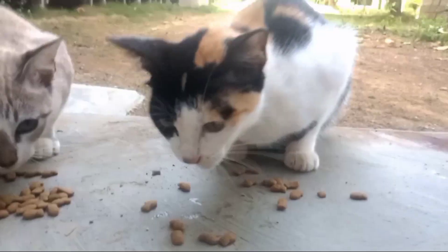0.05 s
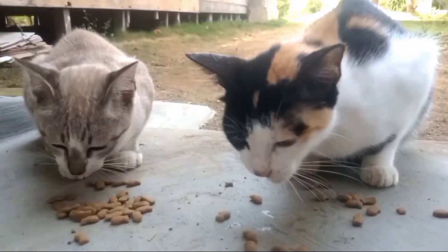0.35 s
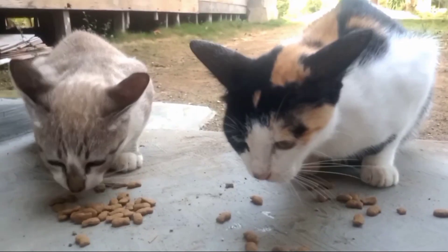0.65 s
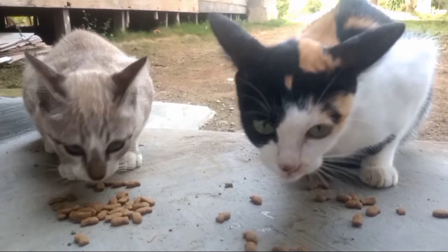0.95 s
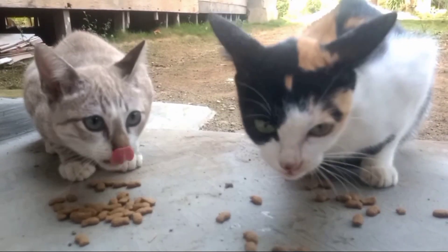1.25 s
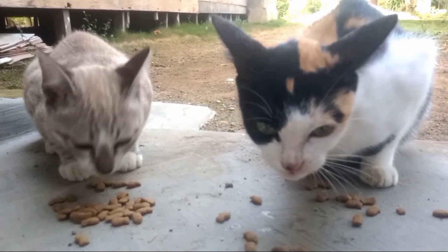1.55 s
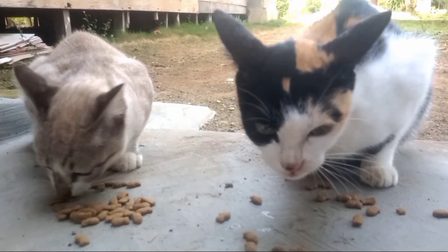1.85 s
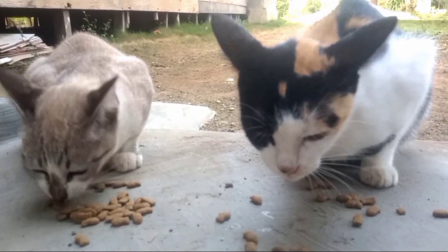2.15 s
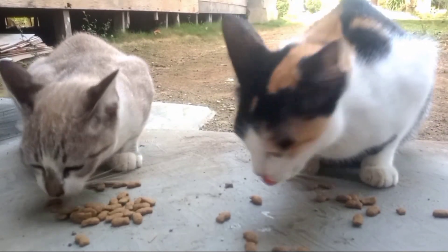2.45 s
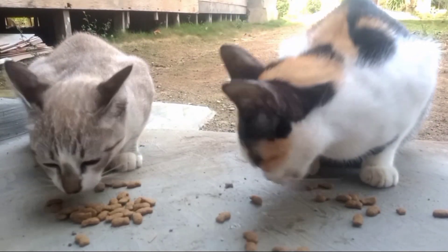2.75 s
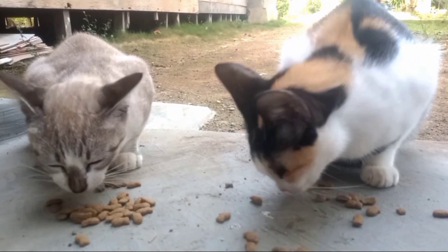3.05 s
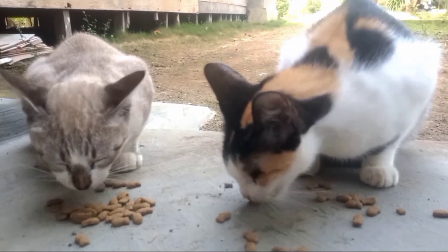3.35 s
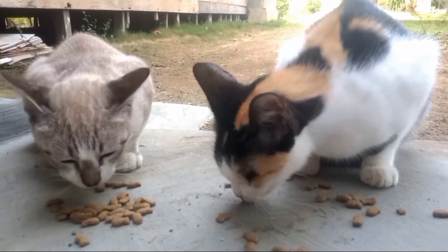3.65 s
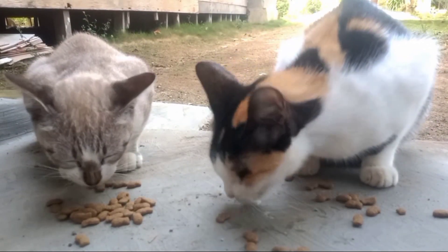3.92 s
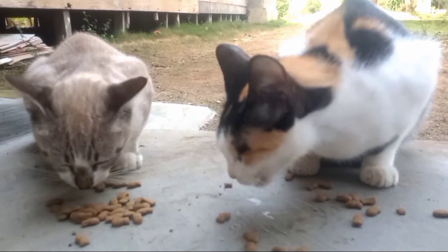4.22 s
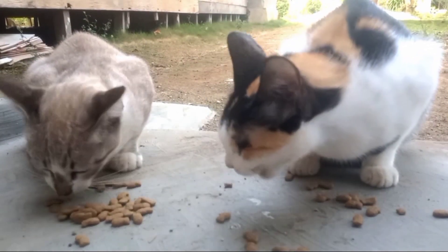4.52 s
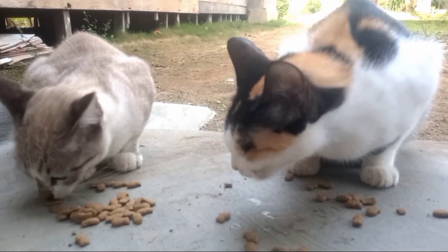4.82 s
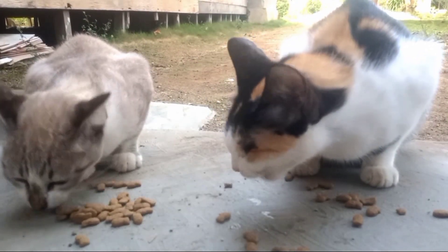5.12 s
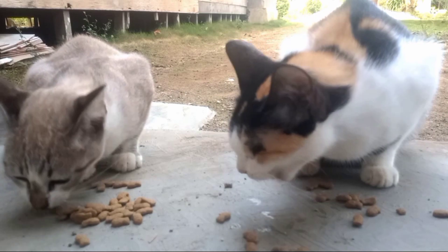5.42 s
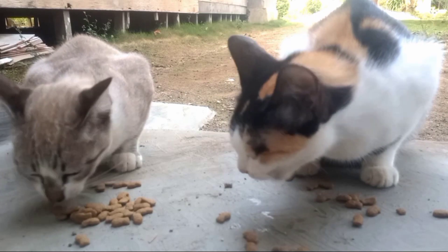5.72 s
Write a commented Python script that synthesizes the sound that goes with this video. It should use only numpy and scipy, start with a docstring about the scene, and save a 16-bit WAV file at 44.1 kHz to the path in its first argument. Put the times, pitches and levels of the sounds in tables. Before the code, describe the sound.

A hand briefly rubs and knocks against the microphone. Then two cats eat dry kibble close by on an outdoor concrete porch, with sharp, irregular cracks, wet lip smacks, soft licks and faintly ticking crumbs. Behind them a small engine chugs past with a low beat, growing louder and slowly gaining speed. A soft rush of outdoor air lies under everything.

```python
"""Two cats crunch dry kibble on a concrete porch: each bite cracks, crumbles, rings the mouth and
bounces off the floor, among wet smacks, licks and ticking crumbs. At first a hand brushes, rubs and
knocks a camera case close by. Behind them a small one-cylinder engine chugs past, slowly gaining
speed, its beat smeared by echoes from house walls. A soft outdoor rush lies under everything."""
import sys
import numpy as np
from scipy import signal
from scipy.fft import rfft, irfft, next_fast_len
from scipy.io import wavfile
from scipy.ndimage import uniform_filter1d, map_coordinates

SR = 44100
rng = np.random.default_rng(int(sys.argv[2]) if len(sys.argv) > 2 else 0)


def wav_out(sig):
    """Save sig, one row per channel (or a flat mono array), as 16-bit PCM at SR to the path in sys.argv[1]."""
    wavfile.write(sys.argv[1], SR, np.round(np.clip(np.atleast_2d(sig).T, -1, 1) * 32767).astype(np.int16))


N = 259308
TIME_S = np.arange(N) / SR


def amp(db):
    """Decibels to gain."""
    return 10 ** (np.asarray(db) / 20)


def unit(x):
    """x scaled to rms 1."""
    return x / np.sqrt(np.mean(x ** 2) + 1e-20)


def curves(rows):
    """One value per sample for each column after the time."""
    times_s, *columns = np.transpose(rows)
    return [np.interp(TIME_S, times_s, column) for column in columns]


def wobble(knots_per_s):
    """A smooth random curve."""
    knots = rng.standard_normal(int(N * knots_per_s / SR) + 4)
    return map_coordinates(knots, [np.arange(N) * knots_per_s / SR])


def swell(middle_s, length_s):
    """A smooth rise and fall, peak 1."""
    return np.cos(np.pi * np.clip((TIME_S - middle_s) / length_s, -.5, .5)) ** 2


def filtered(x, response):
    """x times a complex response of frequency."""
    size = 2 * next_fast_len(len(x) * 2 // 3)
    return irfft(rfft(x, size) * response(np.fft.rfftfreq(size, 1 / SR)), size)[:len(x)]


def coloured(x, points):
    """x through a minimum-phase filter with the gain of the (Hz, dB) points."""
    def response(hz):
        points_hz, db = np.transpose(points)
        cepstrum = irfft(np.log(amp(np.interp(np.log(hz + 1), np.log(points_hz), db))))
        half = len(hz) - 1
        cepstrum[1:half] *= 2
        cepstrum[half + 1:] = 0
        return np.exp(rfft(cepstrum))
    return filtered(x, response)


def resonant(x, modes):
    """x through (centre Hz, width Hz, dB) resonances."""
    def response(hz):
        return sum(amp(db) * 1j * hz * width / (centre ** 2 - hz ** 2 + 1j * hz * width)
                   for centre, width, db in modes)
    return filtered(x, response)


# Outdoor rush and hiss. Each row: time in seconds, relative level in dB.
AIR_LEVELS = [(0.42, -48.5), (1.48, -49), (2.55, -45), (3.77, -44), (5.8, -45.5)]
# Spectra of rush, hiss (also of the swishes) and rumble. Each row: frequency in Hz, gain in dB.
RUSH_SPECTRUM = [(250, 2.5), (550, 11), (800, 4.5), (1050, 2), (1270, 3.5), (1480, 2), (1900, 3),
                 (2300, 0.5), (3300, -1.5), (4200, -8), (5300, -26), (7000, -41.5), (12000, -74.5)]
HISS_SPECTRUM = [(3000, -23), (5500, -5), (6500, -5.5), (7800, 3.5), (9500, -4.5), (12000, -9), (14000, -4),
                 (15400, -6), (16000, -31)]
RUMBLE_SPECTRUM = [(38, -42), (57, 4), (75, 0), (100, 3.5), (150, -0.5), (230, -3), (420, -12), (600, -30),
                   (1000, -49), (4000, -110)]
# Far whistles. Each row: middle in seconds, length in seconds, pitch in Hz, level in dB.
WHISTLES = [(1.858, 0.034, 3700, -47.5), (4.38, 0.34, 1920, -46.5)]


def outdoors(rush_db=3, hiss_db=-23, rumble_db=-36, waver_hz=14):
    """A soft rush, a faint hiss, a low rumble and two thin, far whistles."""
    def noise(spectrum):
        return unit(coloured(rng.standard_normal(N), spectrum))

    def tone(hz):
        return unit(np.sin(2 * np.pi * np.cumsum(hz + waver_hz * wobble(45)) / SR))

    air_db, = curves(AIR_LEVELS)
    rush = noise(RUSH_SPECTRUM) * amp(air_db + rush_db + 0.61 * wobble(12))
    hiss = noise(HISS_SPECTRUM) * amp(air_db + hiss_db + wobble(22))
    rumble = noise(RUMBLE_SPECTRUM) * amp(rumble_db + wobble(13))
    whistles = sum(amp(db) * swell(middle_s, length_s) * tone(hz)
                   for middle_s, length_s, hz, db in WHISTLES)
    return rush + hiss + rumble + whistles


# Exhaust boom. Each row: time in seconds, levels of orders 3, 5 and 6 in dB.
BOOM_LEVELS = [(0.12, -43, -44, -50.5), (1.12, -41.5, -34, -32.5), (1.36, -36.5, -44, -34),
               (1.6, -38, -35, -35), (2.0, -47, -31.5, -35), (2.48, -59, -37, -32),
               (2.8, -38.5, -39, -28.5), (3.12, -42, -32.0, -31), (3.48, -36.5, -28, -28),
               (3.76, -34.5, -29.5, -39.5), (4.08, -36, -36, -29.5), (4.36, -30, -51, -33),
               (4.64, -38, -36, -32), (5.08, -33.5, -31.5, -26), (5.2, -39, -28.5, -31),
               (5.76, -41, -28.5, -32)]
# Floor of the weak orders. Each row: frequency in Hz, level in dB.
PIPE_SPECTRUM = [(48, -64), (57, -39.5), (70, -47), (92, -65), (116, -43.5), (185, -49), (230, -48.5),
                 (280, -52.5), (450, -51), (520, -80)]


def exhaust(firing_hz, turns, bark_db, bark_hz, bark_width_hz=75, boom_top_hz=172, boom_lag_s=.0045):
    """Multiples of the firing rate line up into puffs: the pipe barks and a low boom follows."""
    third_db, fifth_db, sixth_db = curves(BOOM_LEVELS)
    seventh_db = sixth_db - 2 - .5 * np.maximum(7 * firing_hz - boom_top_hz, 0)
    boom_db = {3: third_db, 5: fifth_db, 6: sixth_db, 7: seventh_db}
    # Wall echoes pull the orders out of step, less while the engine crosses an open gap.
    smear_rad = 1.36 * (1 - 0.81 * swell(middle_s=2.95, length_s=4.1))
    beat = np.zeros(N)
    for order in range(2, 19):
        hz = order * firing_hz
        if order in boom_db:
            gain = amp(boom_db[order])
            phase = 2 * np.pi * boom_lag_s * (6.5 * firing_hz - hz) + smear_rad * wobble(3) / 6
        else:
            ring = amp(bark_db - 4.5) / (1 + (2 * (hz - bark_hz) / bark_width_hz) ** 2)
            gain = np.hypot(ring, amp(np.interp(hz, *np.transpose(PIPE_SPECTRUM))))
            phase = smear_rad * wobble(1.53)
        waver = amp(0.67 * wobble(9))
        beat += np.sqrt(2) * gain * waver * np.cos(2 * np.pi * order * turns + phase)
    return beat


# Engine speed. Each row: time in seconds, firing rate in Hz.
FIRING_RATES = [(.8, 23.1), (1.8, 24.55), (2.75, 25.72), (3.5, 27.09), (4.5, 28.1), (5.0, 28.73)]
# The pipe's broad resonance. Each row: time in seconds, relative level in dB, centre in Hz.
PIPE_BARK = [(0.45, -51, 365), (1.64, -42, 322), (2.0, -33.5, 372), (2.55, -30.5, 373), (3.06, -27.5, 346),
             (3.4, -34.5, 344), (3.7, -27.5, 351), (4.3, -35, 354), (5.0, -36, 360), (5.55, -46.5, 314)]
# Spectra of turbulent gas and of moving parts. Each row: frequency in Hz, gain in dB.
GAS_SPECTRUM = [(40, -25.5), (70, 1.5), (100, 3.5), (150, 9), (200, -2.5), (260, -4), (350, 1.5),
                (440, 1.5), (520, -14.5), (800, -18), (2000, -48.5), (5000, -110)]
CLATTER_SPECTRUM = [(350, -13), (600, 6), (790, 0), (950, -12.5), (1240, 0), (1430, -12.5), (1700, -4),
                    (3800, -8.5), (7000, -71)]


def engine(gas_t60_s=0.12, gas_db=-41, clatter_db=-16, loose_db=-5, flutter_db=0.37):
    """One cylinder fires; turbulent gas and the clatter of moving parts follow each exhaust puff."""
    firing_hz, = curves(FIRING_RATES)
    turns = np.cumsum(firing_hz) / SR - .86
    bark_db, bark_hz = curves(PIPE_BARK)
    beat = exhaust(firing_hz, turns, bark_db, bark_hz)
    puff_age_s = ((turns + .1) % 1) / firing_hz
    flow = unit(amp(-60 * puff_age_s / gas_t60_s))
    turbulence = unit(coloured(flow * rng.standard_normal(N), GAS_SPECTRUM))
    gas = amp(gas_db + 0.45 * (bark_db - bark_db.mean())) * turbulence
    # The same knocks come round on every turn, fading from one pattern to another.
    patterns = rng.standard_normal((2, round(SR / firing_hz.mean())))
    position = [np.arange(N) / N, turns % 1 * patterns.shape[1]]
    knocks = unit(map_coordinates(patterns, position, order=1, mode='nearest'))
    rattle = (2 + flow) * (knocks + amp(loose_db) * rng.standard_normal(N))
    clatter = amp(bark_db + clatter_db) * unit(coloured(rattle, CLATTER_SPECTRUM))
    return beat * amp(flutter_db * wobble(26)) + gas + clatter


def stroke(start_s, hold_s, db, release_t60_s, grip_s=0.03):
    """Pressure of one stroke of skin: it grips just before start_s, holds, then lets go."""
    age_s = TIME_S - start_s
    grip = np.clip(1 + age_s / grip_s, 0, 1) ** 2
    return grip * amp(db - 60 * np.maximum(age_s - hold_s, 0) / release_t60_s)


# Skin drags. Each row: start in seconds, hold in seconds, relative level in dB, release T60 in seconds.
SKIN_STROKES = [(0.05, 0.092, -42.5, 0.56), (0.256, 0.047, -23, 0.074), (0.757, .015, -35, 0.28)]
# Jolts of a hard scrape. Each row: start in seconds, level in dB.
SKIN_SLIPS = [(0.2363, -25), (0.2446, -15.5), (0.2548, -15.5), (0.26, -16.5), (0.266, -19.5),
              (0.2736, -12.5), (0.2766, -15), (0.283, -15), (0.2874, -11), (0.75, -24)]
# Spectrum of the rubbing. Each row: frequency in Hz, gain in dB.
SKIN_SPECTRUM = [(40, -24), (130, 7.5), (380, 3), (650, -7.5), (950, -4), (1300, -1), (1600, -7),
                 (2000, -2.5), (2900, -4), (4200, -11.5), (5300, -32), (7800, -25.5), (10000, -37),
                 (16000, -34)]
# Case resonances. Each row: centre in Hz, width in Hz, gain in dB.
CASE_MODES = [(1360, 200, 8.5), (1940, 91, 12.5), (2445, 65, 11), (2626, 57, 10), (2870, 220, 9)]


def hand(ring_db=4, drag_db=-5, grain_db=1, slip_t60_s=0.017, slip_rise_s=0.00034):
    """Skin drags over the camera case and slips in jolts; each is a short rasp that rings it."""
    jolts = np.zeros(N)
    for start_s, db in SKIN_SLIPS:
        age_s = np.maximum(TIME_S - start_s, 0)
        jolts += amp(db - 60 * age_s / slip_t60_s) * (1 - np.exp(-age_s / slip_rise_s))
    drag = amp(drag_db) * sum(stroke(*row) for row in SKIN_STROKES)
    force = (jolts + drag) * unit(rng.standard_normal(N) * amp(grain_db * wobble(900)))
    rub = coloured(force, SKIN_SPECTRUM)
    ring = amp(ring_db) * unit(resonant(rub, CASE_MODES))
    return np.std(force) * unit(unit(rub) + ring)


# A hand's brush at 0.152 s, then licks. Each row: middle in seconds, length in seconds, level in dB.
SWISHES = [(0.152, 0.36, -61.5), (0.55, 0.2, -67), (0.77, 0.11, -64.5), (1.216, 0.19, -64),
           (1.553, 0.045, -62), (1.927, .13, -68), (2.802, 0.94, -71), (3.415, 0.58, -69),
           (3.82, 0.79, -67), (4.95, .8, -74)]


def brush_and_licks(grain_db=4):
    """Soft, grainy hisses: first a hand brushes the camera, then a tongue rasps over lips or floor."""
    rasp = unit(coloured(rng.standard_normal(N) * amp(grain_db * wobble(390)), HISS_SPECTRUM))
    return rasp * sum(amp(db) * swell(middle_s, length_s) for middle_s, length_s, db in SWISHES)


# Spectra of a crack and of its dry snap. Each row: frequency in Hz, gain in dB.
CRACK_SPECTRUM = [(200, -21), (700, 4.5), (1300, 9), (2400, 10.5), (3600, 7), (4400, 1), (6000, -35.5),
                  (12000, -93)]
DRY_SNAP_SPECTRUM = [(2500, -22), (4500, -2), (6000, -9), (7900, 1.5), (10000, -8), (15500, -11)]


def chewing(ticks_per_s=7, tick_db=-36, spread_db=3.5):
    """Crumbs tick faintly between the teeth."""
    ticks = (rng.random(N) < ticks_per_s / SR) * amp(tick_db + spread_db * rng.standard_normal(N))
    return 2 * coloured(ticks, CRACK_SPECTRUM) + coloured(ticks, DRY_SNAP_SPECTRUM)


def impact(tail_t60_s, crack_t60_s=0.0034, tail_db=-2, rise_s=0.0012, jolt_s=.0005, jolt_db=1.5):
    """Force of a bite, smack or knock: one jolt over a short crack and a gritty tail."""
    age_s = np.arange(SR // 16) / SR
    crack = rng.standard_normal(len(age_s)) * amp(-60 * age_s / crack_t60_s)
    tail = rng.laplace(size=len(age_s)) * amp(-60 * age_s / max(tail_t60_s, .004))
    attack = 1 - np.exp(-age_s / rise_s)
    grit = unit((unit(crack) + amp(tail_db) * unit(tail)) * attack)
    return grit + amp(jolt_db) * unit(signal.unit_impulse(len(age_s), round(jolt_s * SR)))


def click(force, ring_hz, ring_db, snap_spectrum, snap_db, ring_width_hz=300, floor_db=-7.5):
    """An impact snaps, rings a mouth or the case and bounces off the concrete; peak 2 ms rms is 1."""
    crack = unit(coloured(force, CRACK_SPECTRUM))
    ring = amp(ring_db) * unit(resonant(crack, [(ring_hz, ring_width_hz, 0)]))
    direct = unit(crack + ring) + amp(snap_db) * unit(coloured(force, snap_spectrum))
    bounce_s = .0028 * np.exp(rng.standard_normal() / 10)
    sound = filtered(direct, lambda hz: 1 + amp(floor_db) * np.exp(-2j * np.pi * hz * bounce_s))
    return sound / np.sqrt(uniform_filter1d(sound ** 2, size=88).max())


# Treble of a wet smack. Each row: frequency in Hz, gain in dB.
WET_SNAP_SPECTRUM = [(2500, -26), (4500, 0), (5800, -12), (7700, 9.5), (9500, -13), (15500, -47)]
# Dry cracks and wet lip smacks. Each row: start in seconds, relative peak in dB, resonance in Hz,
# its ring against the crack in dB, relative snap level in dB. The cracks at 0.3352 and 0.3682 s are
# knocks on the camera case, ringing near 1350 Hz; the others are bites that ring the mouth.
DRY_CRACKS = [(0.1024, -28, 1820, -4, -35), (0.194, -29.5, 2930, 2, -22), (0.301, -15.5, 1390, -14, -18),
              (0.3352, -10.5, 1400, 6, -44), (0.343, -19.5, 2400, -6, -22),
              (0.3682, -13.5, 1350, -3, -24.5), (0.4174, -35, 2700, 7, -32), (0.4419, -31.5, 2520, 14, -24),
              (0.595, -20.5, 2600, 25, -39), (0.5995, -23.5, 3120, 22, -34), (0.694, -23.5, 2440, -4, -22),
              (0.7377, -28, 2950, 1, -34), (0.9619, -20, 1690, 10, -27.5), (1.6704, -14, 2370, 7, -23),
              (2.1086, -7.5, 2000, 6, -25), (3.3857, -25.5, 2440, 3, -29), (3.4136, -27.5, 1930, -1, -26),
              (3.5034, -22, 2140, 17, -41), (3.5220, -11.5, 2340, 9, -26.5), (3.5272, -19, 1940, 0, -19),
              (3.626, -22, 2430, -6, -23), (3.885, -21.5, 3370, -5, -20.5), (4.153, -30.5, 1940, 2, -21),
              (4.228, -24, 2200, 0, -36), (4.5819, -30, 1670, -13, -24), (4.6012, -26, 3400, 9, -26.5),
              (4.9322, -16, 1910, -3, -23), (5.199, -21, 2000, 3, -33), (5.3713, -27.5, 2500, 2, -23),
              (5.414, -14.5, 1610, 3, -24)]
SMACKS = [(0.8724, -25.5, 2050, 2, -25), (1.2385, -19.5, 3770, 5, -13), (1.5234, -30, 2320, 11, -40),
          (1.5366, -24.5, 2500, 18, -36), (1.73, -34.5, 4130, 11, -30), (1.8305, -29.5, 1790, -4, -25.5)]


def cats_and_knocks(gain_db=-7, dry_db=6.5, wet_db=9, soft_t60_s=0.036, soft_db=-19, halving_db=5.5):
    """Teeth break kibble, lips smack and the case is knocked twice; harder hits die away sooner."""
    out = np.zeros(N + SR)
    kinds = (DRY_CRACKS, DRY_SNAP_SPECTRUM, dry_db), (SMACKS, WET_SNAP_SPECTRUM, wet_db)
    for rows, snap_spectrum, boost_db in kinds:
        for start_s, db, ring_hz, ring_db, snap_db in rows:
            tail_t60_s = soft_t60_s * .5 ** (max(db - soft_db, 0) / halving_db)
            sound = click(impact(tail_t60_s), ring_hz, ring_db, snap_spectrum, snap_db + boost_db)
            out[round(start_s * SR):][:len(sound)] += amp(db + gain_db) * sound
    return out[:N]


def scene():
    """All sources at one microphone."""
    return (cats_and_knocks() + chewing() + brush_and_licks() + hand() + engine() + outdoors())[None]


def record(dry, open_s=.068, fade_s=.004, top_hz=15900):
    """The microphone opens after a moment and keeps nothing above its band limit."""
    opened = np.clip((TIME_S - open_s) / fade_s, 0, 1)
    return filtered(dry[0] * opened, lambda hz: 1 / (1 + (hz / top_hz) ** 120))[None]


dry = scene()
out = record(dry)
wav_out(out)
```